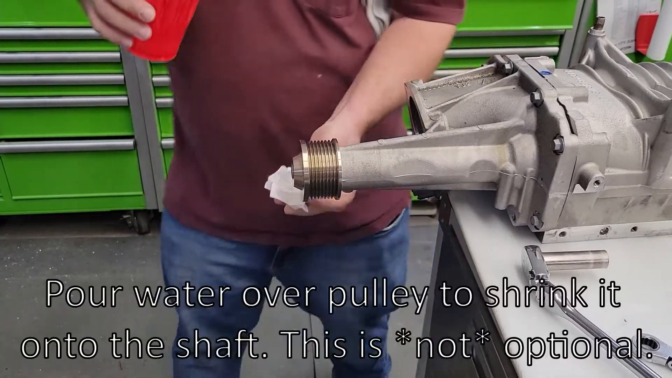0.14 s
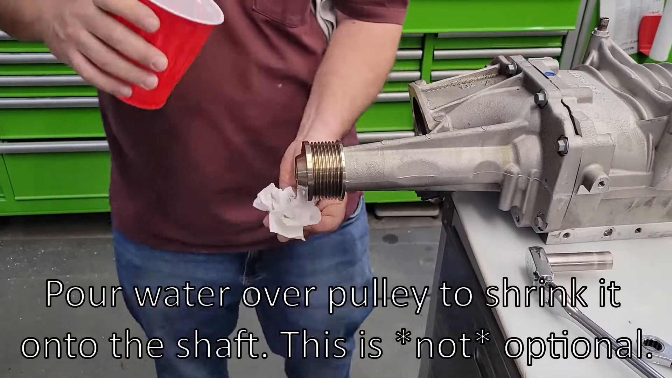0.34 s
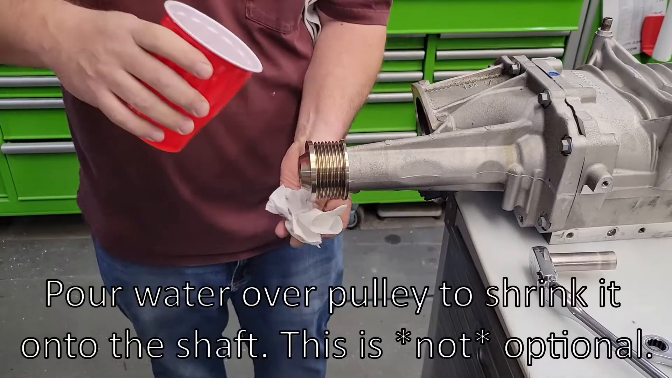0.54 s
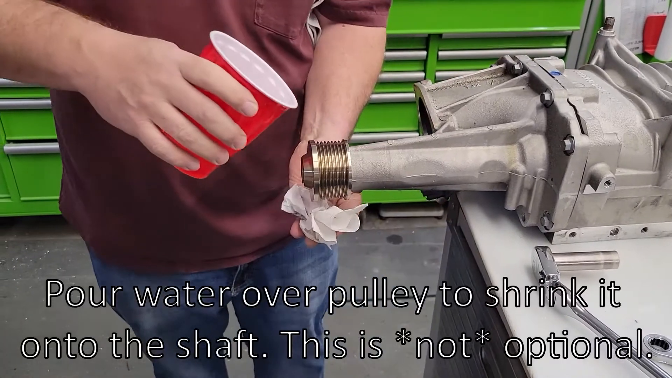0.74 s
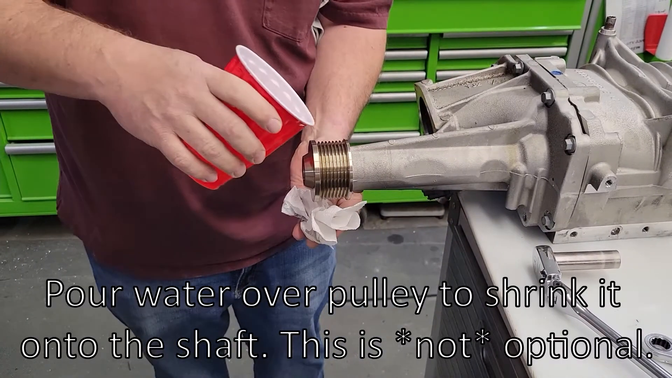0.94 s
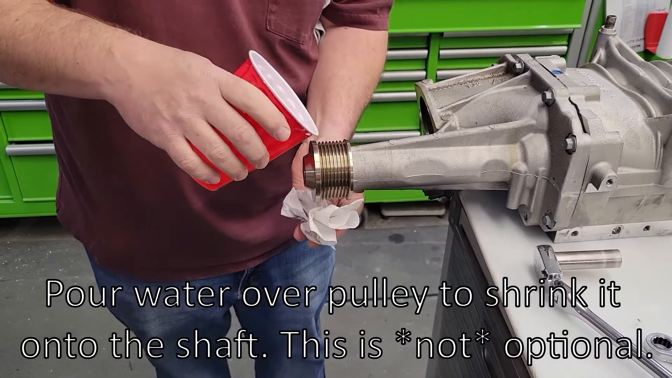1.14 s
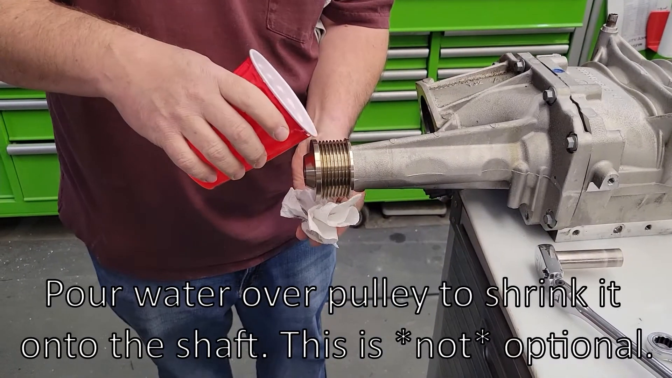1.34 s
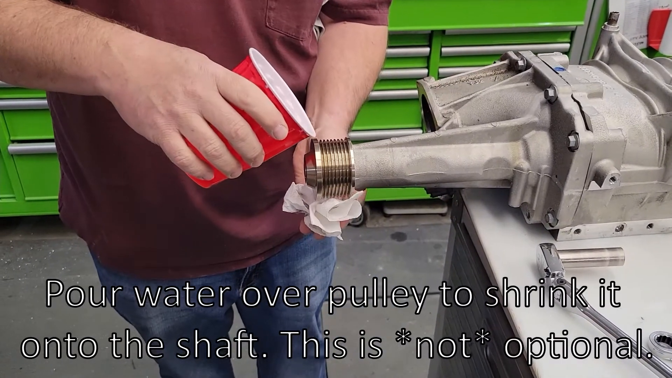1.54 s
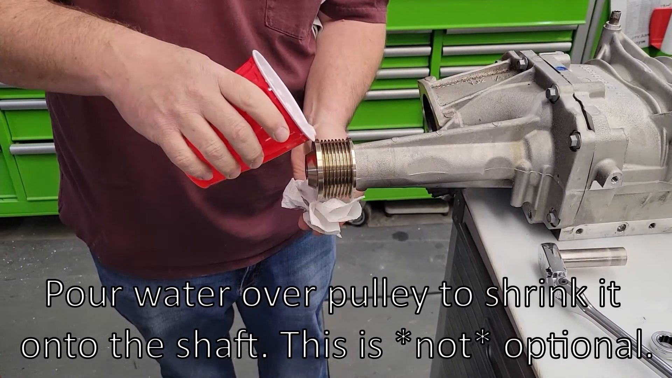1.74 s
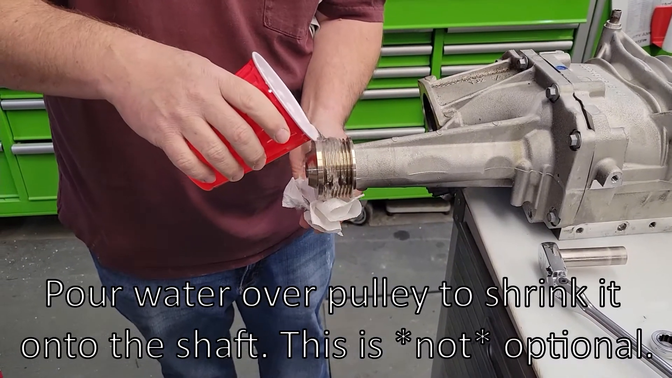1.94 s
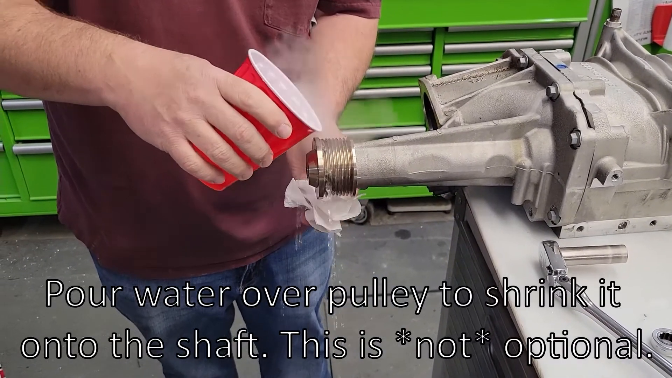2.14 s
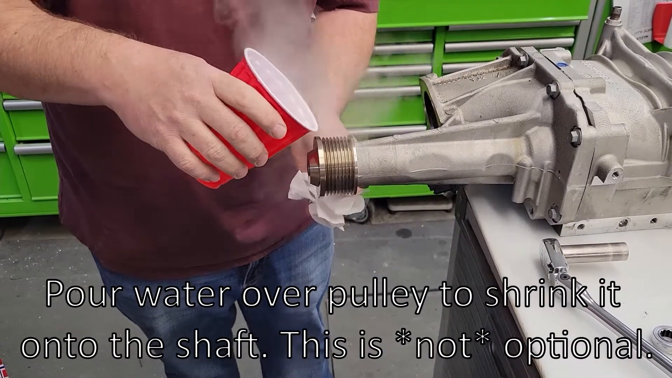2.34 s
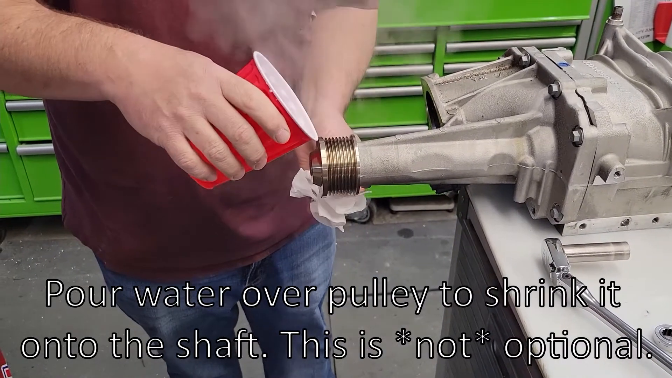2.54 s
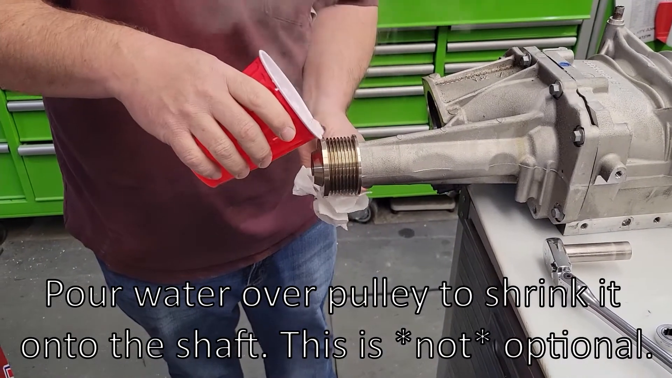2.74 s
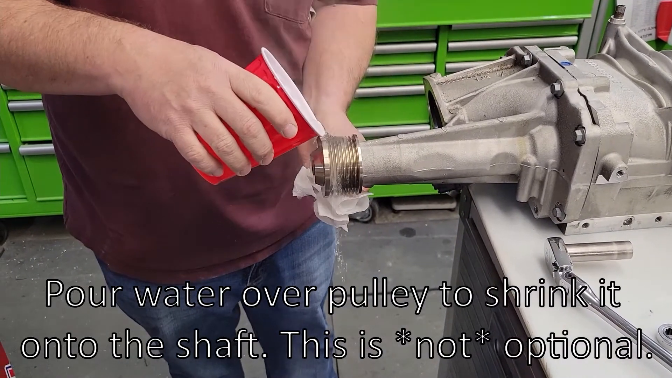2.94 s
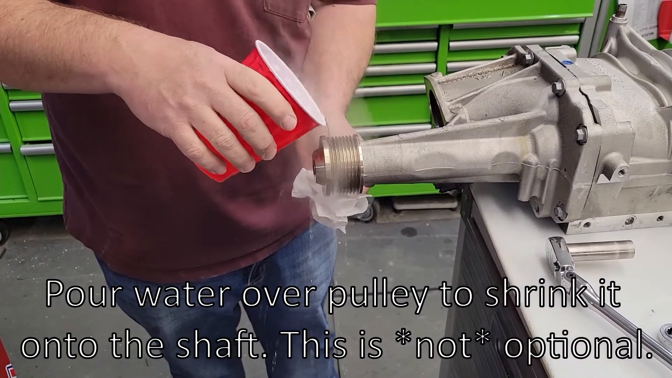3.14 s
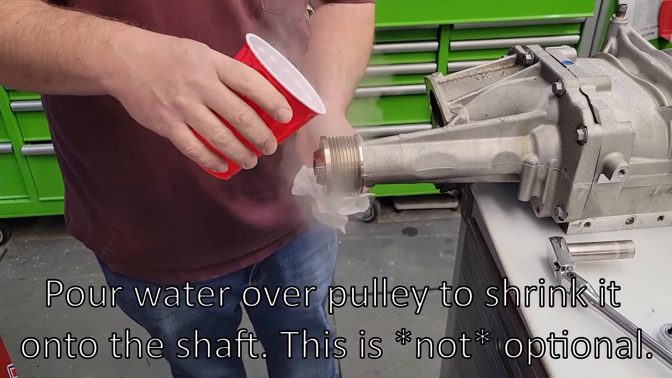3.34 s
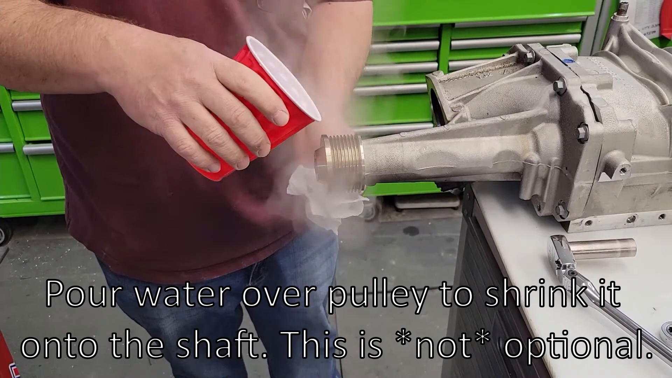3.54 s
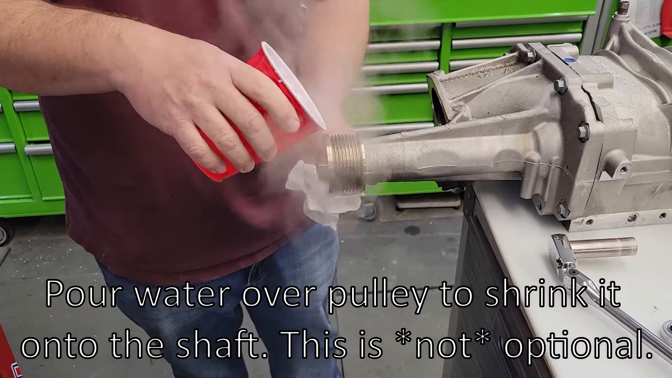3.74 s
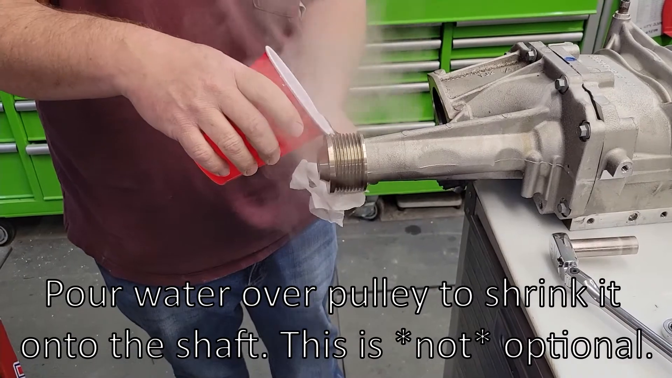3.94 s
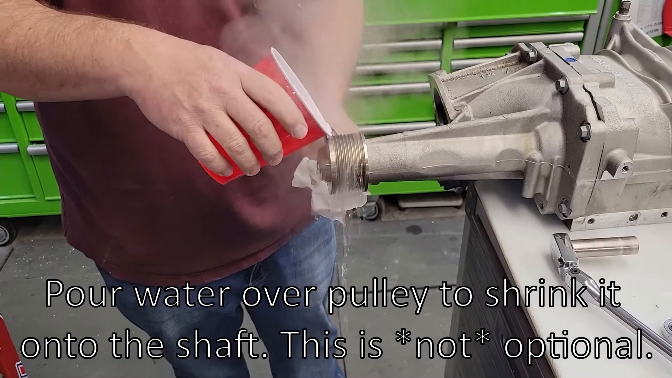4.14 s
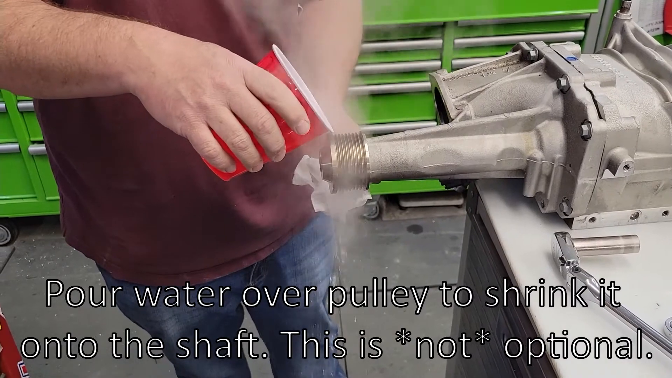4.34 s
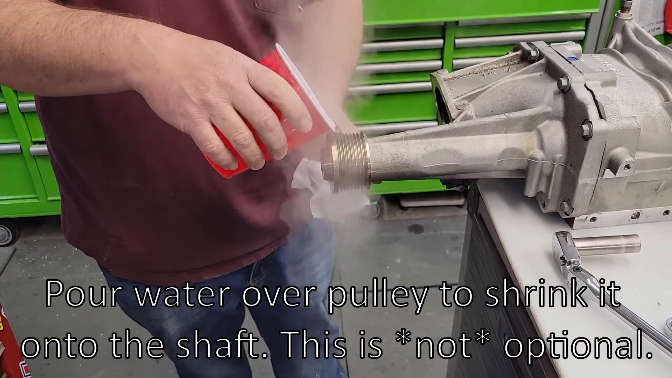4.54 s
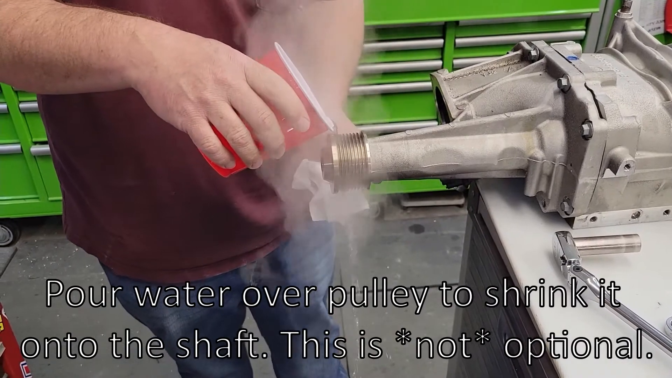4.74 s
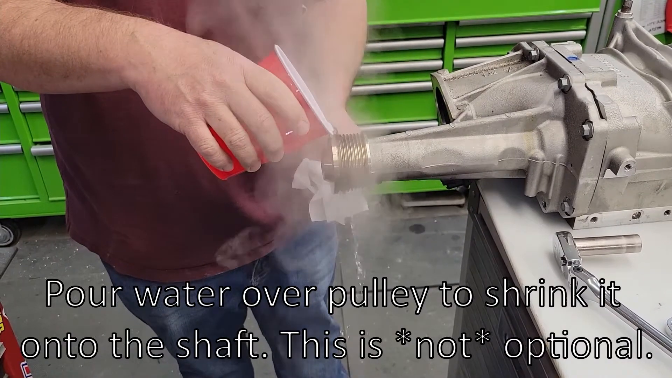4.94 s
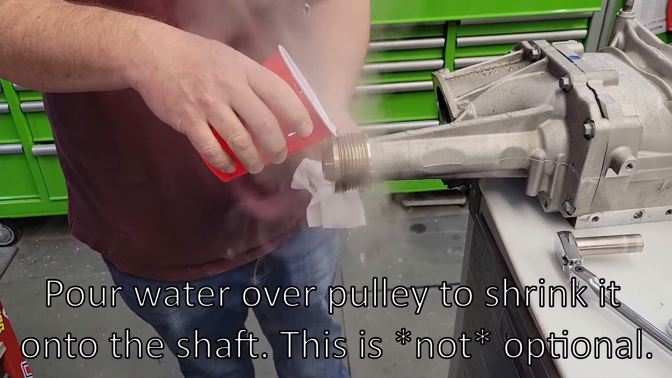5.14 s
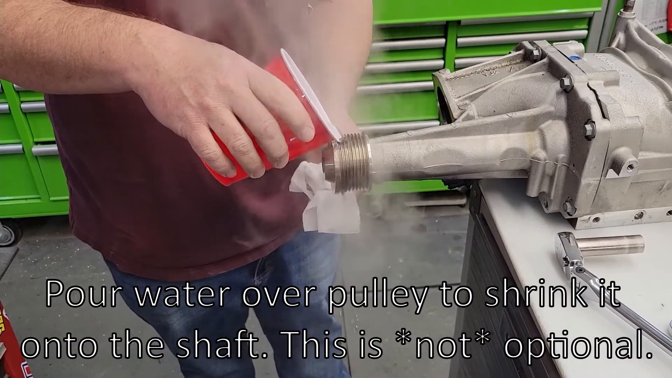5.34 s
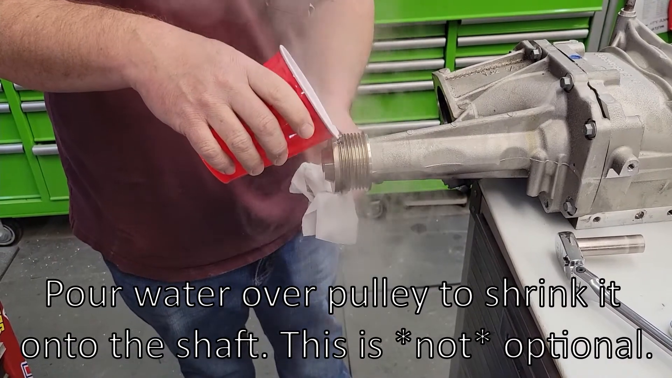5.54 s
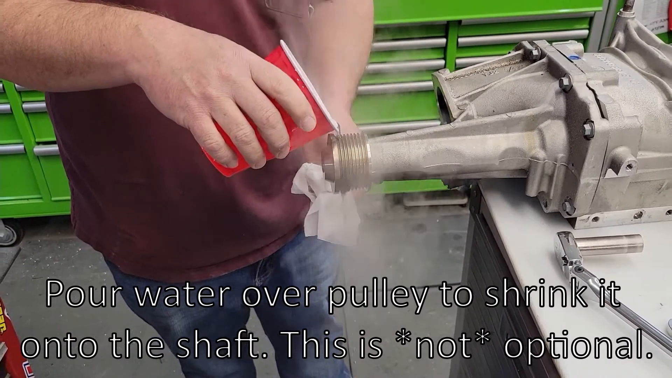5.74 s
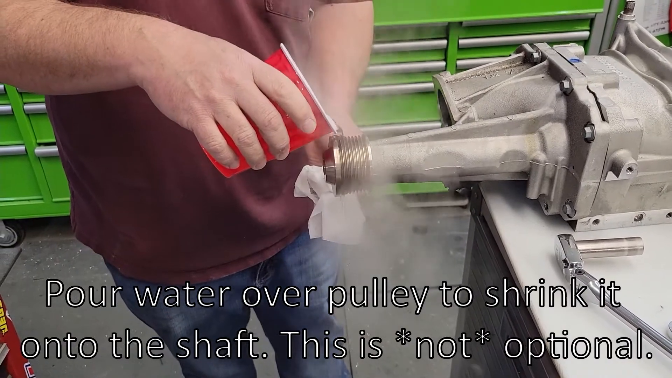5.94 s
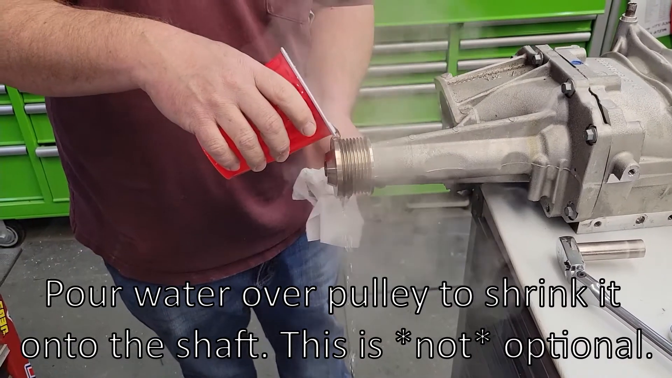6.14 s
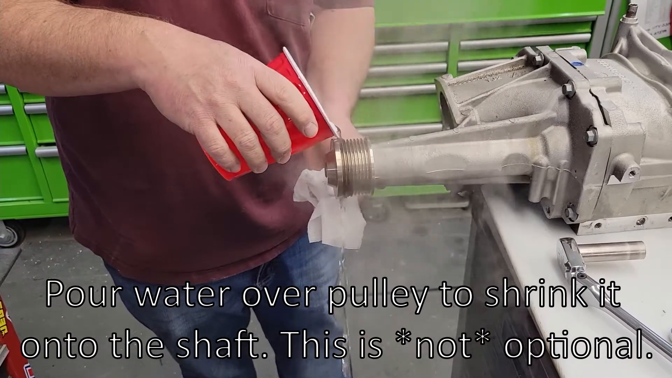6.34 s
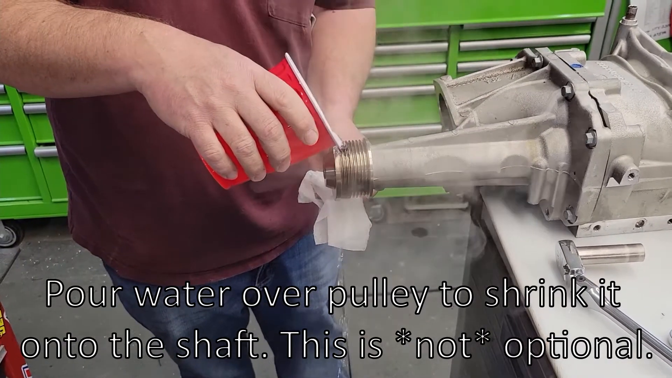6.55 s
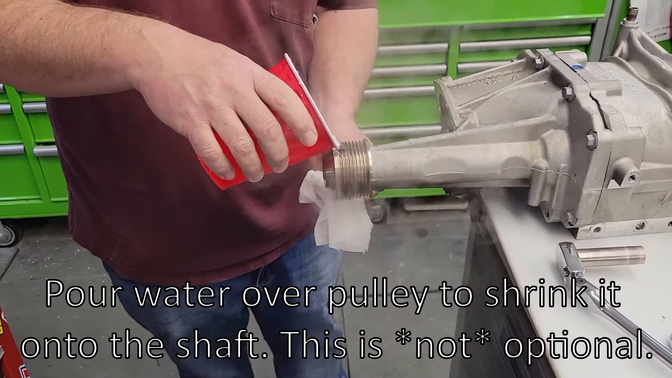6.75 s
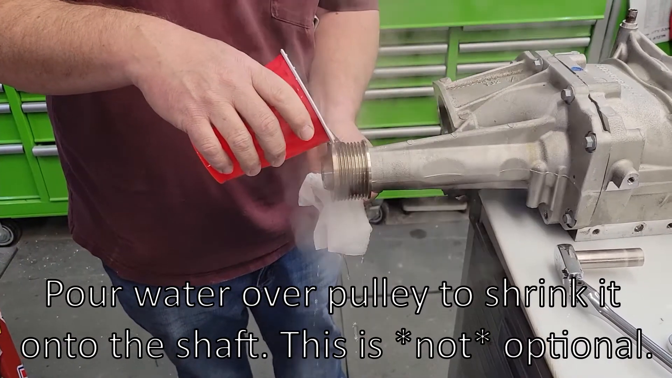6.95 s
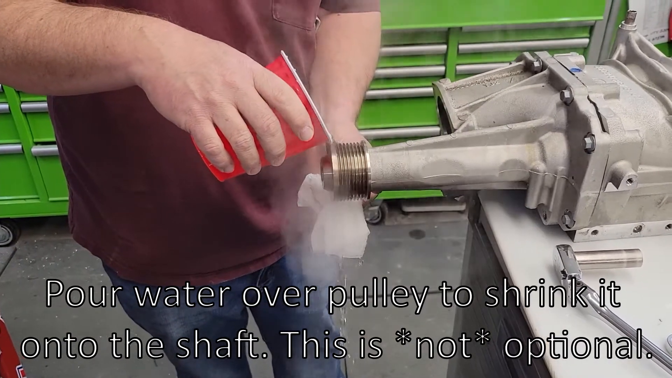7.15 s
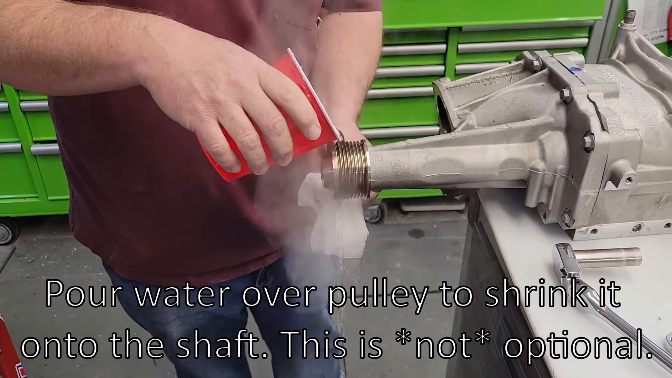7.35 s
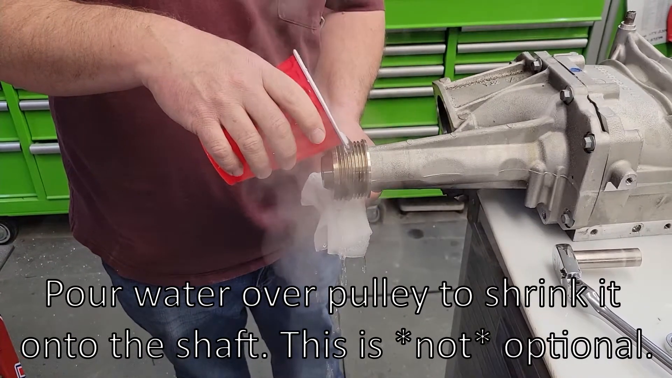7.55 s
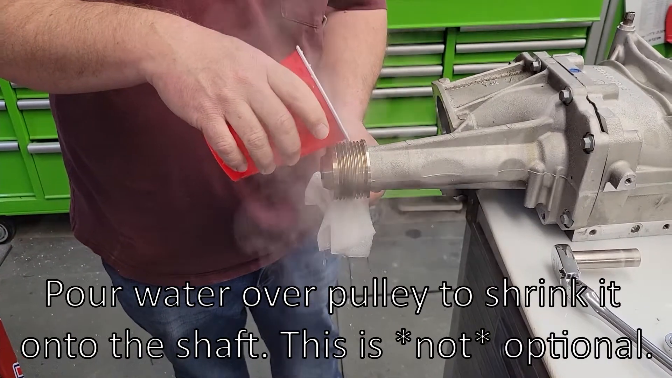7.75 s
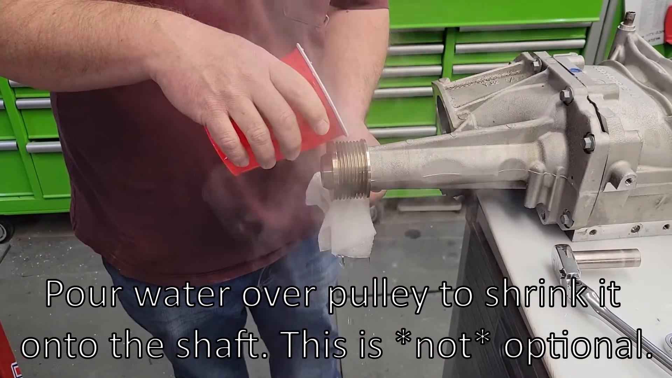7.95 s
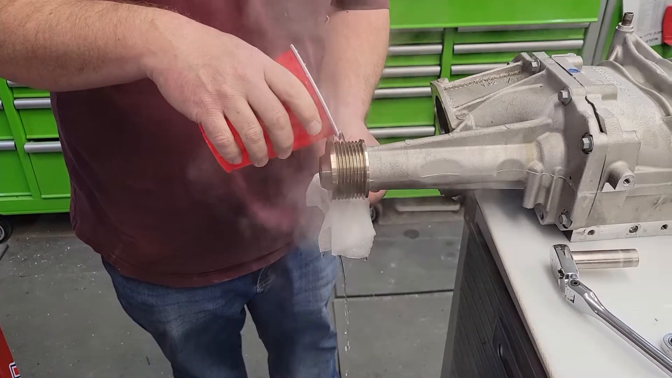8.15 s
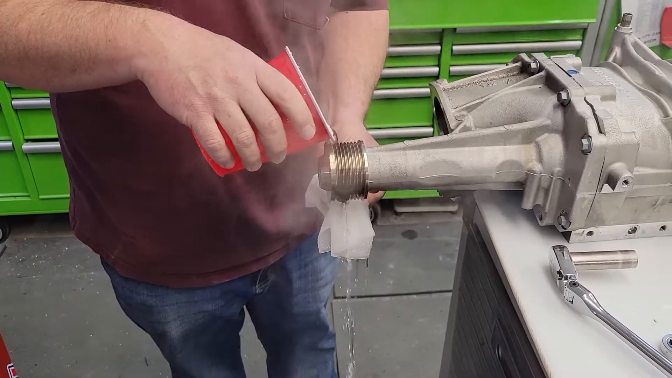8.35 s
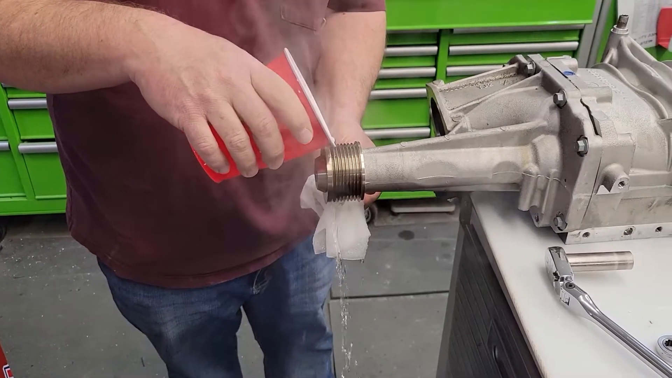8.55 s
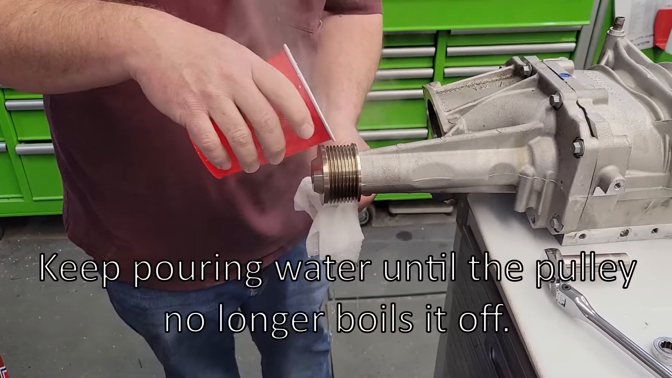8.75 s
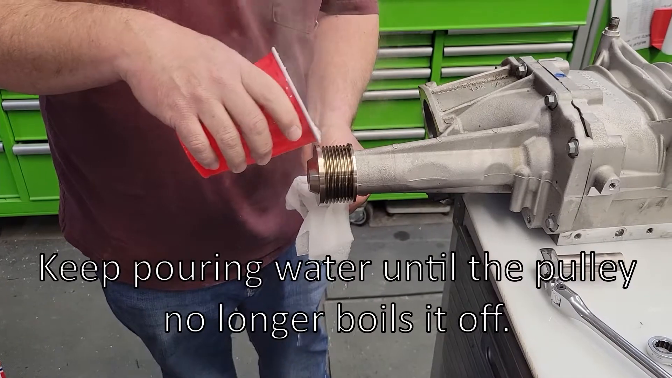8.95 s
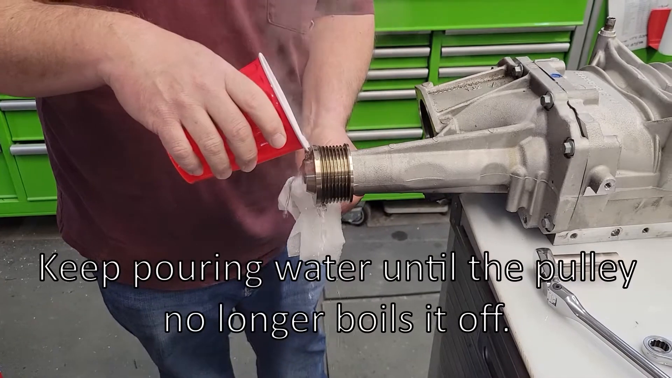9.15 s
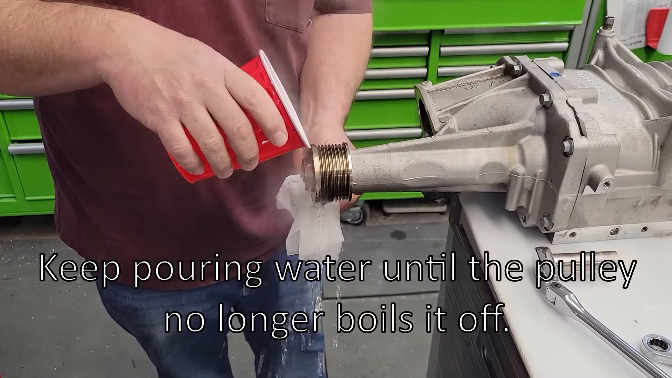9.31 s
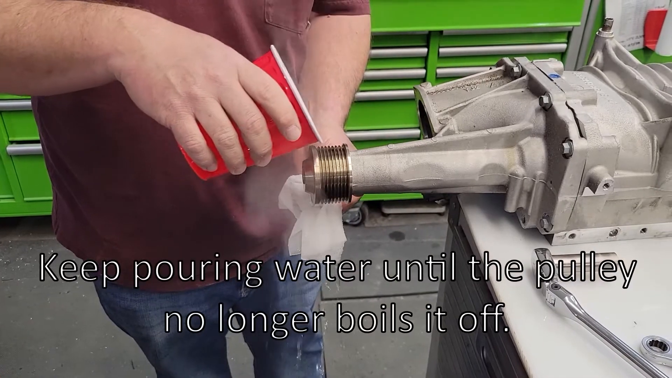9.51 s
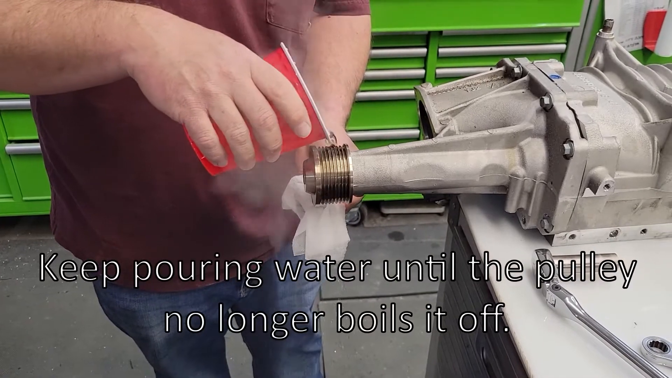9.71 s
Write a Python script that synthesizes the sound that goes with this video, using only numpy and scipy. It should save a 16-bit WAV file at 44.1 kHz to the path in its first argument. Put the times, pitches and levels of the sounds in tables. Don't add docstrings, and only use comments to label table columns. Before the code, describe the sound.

Cloth rustles and small knocks on a workshop bench, then water splashes onto hot metal, hissing, sizzling and spitting over a low fan rumble.

```python
import sys
import numpy as np
from scipy import signal
from scipy.fft import rfft, irfft, next_fast_len
from scipy.io import wavfile
from scipy.ndimage import uniform_filter1d

SR = 44100
rng = np.random.default_rng(int(sys.argv[2]) if len(sys.argv) > 2 else 0)


def to_wav(s):
    ch = np.atleast_2d(s).T
    pcm = np.round(np.clip(ch, -1, 1) * 32767)
    wavfile.write(sys.argv[1], SR, pcm.astype(np.int16))


def magnitude_from_level(level_db):
    exponent = np.asarray(level_db, float) / 20
    return 10 ** exponent


N = 431298
SIZE = 8192
STEP = 32
HZ = np.maximum(np.fft.rfftfreq(SIZE, 1 / SR), 1)
T = np.arange(N) / SR

# f/Hz, level/dB per Hz
SHOP_SPECTRUM = [(13, -23), (22, -15), (64, -7), (112, -12.5), (205, -17), (310, -23), (337, -17),
                 (444, -26), (750, -26.5), (1450, -40), (3920, -45.5), (6620, -45.5), (9740, -57),
                 (12100, -59), (16000, -59)]
# f/Hz, level/dB
FAN_LINES = [(37.7, -87), (58, -74), (80.7, -67), (107.7, -63), (269.2, -74.5), (748.3, -79)]
# loudest t/s, level/dB, swell/dB per s, fade/dB per s, body over it/dB
RUSTLES = [(.038, -58, 170, 152, -8), (.094, -54, 700, 700, 2), (.14, -73, 60, 60, -2),
           (.246, -56.5, 130, 130, -7.5), (.35, -66, 30, 34, -7), (.416, -54, 500, 170, 0),
           (.5, -61, 60, 40, 1.5), (.802, -71, 891, 400, 4), (1.0, -79.5, 24, 43, 14.5),
           (1.32, -71.5, 25, 700, -6), (1.72, -70, 900, 300, -8)]
# t/s, peak/dB, tick f/Hz, rattle/dB, thump/dB
KNOCKS = [
    (0.089, -41, 3550, -13, -19),
    (0.108, -45, 1080, -17, -15),
    (0.341, -46, 802, -16, -23),
    (0.412, -38, 4160, -13.5, -13.5),
    (0.432, -35.5, 1370, -24, -12),
    (0.442, -43, 1040, -24, -25),
    (0.449, -43, 990, -31, -8),
    (0.799, -33, 1670, -8, -34),
    (0.897, -50, 1080, -11, -16),
]
# f/Hz, width/Hz, level/dB
BENCH_MODES = [(1050, 61, 10), (1760, 120, -2), (2140, 150, 4)]
# f/Hz, level/dB per Hz
RATTLE_SPECTRUM = [(250, -24), (600, -8), (1200, 1.5), (2400, -2.5), (3500, -10.5), (6000, -23),
                   (9000, -46)]
# start t/s, fizz/dB, wet/s, drying/dB per s, jets over fizz/dB
GUSHES = [(1.788, -22, 0.41, 70, -7), (2.772, -23.5, .55, 48, -4), (3.58, -44, .31, 200, -8.5),
          (3.932, -22.5, 0.31, 35, -3.5), (4.24, -30.5, 0.29, 71, -11), (4.507, -29.5, 0.7, 1, -0.5),
          (4.818, -30.5, 0.52, 122, -1.1), (5.303, -29.5, 0.35, 18, -1.5), (5.854, -37.5, 0.35, 13, -6.5),
          (5.978, -31.8, 0.22, 97, 0), (6.193, -40, .6, 15, 1.3), (6.55, -30, .46, 60, -2.4),
          (6.851, -30.5, 0.43, 80, -4), (7.296, -39.5, 0.28, 146, -7), (7.492, -35.5, 0.33, 132, -2),
          (7.605, -32, 0.32, 51, -3.5), (7.815, -38, 0.097, 10, -8.5), (8.076, -37, 0.28, 150, -3.5),
          (8.348, -42.5, 0.35, 146, -3.5), (8.781, -43.5, .56, 26, -6), (8.875, -27, 0.047, 352, -15),
          (9.03, -27, 0.024, 24, -1), (9.136, -29.5, 0.29, 68, -8), (9.545, -45.5, 0.14, 41, -7.5)]
# f/Hz, level/dB per Hz
FIZZ = [(1100, -36), (1700, -11.5), (2300, -3), (3300, -0.5), (3900, 1), (5000, -2), (5600, -6),
        (6300, -35), (7500, -40)]
# f/Hz, level/dB per Hz
STEAM = [(6500, -68), (8000, -1.5), (9000, -4.5), (10000, -5), (11200, -5.5), (12200, 2), (14000, 1),
         (15600, 2.5), (17000, -3.5)]
# f/Hz, level/dB per Hz
BOIL = [(350, -42), (520, -4.5), (800, 4.5), (1100, 4.5), (1500, -2), (2000, 0), (2600, -66)]
# f/Hz, level/dB per Hz
SPRAY = [(4100, -27.5), (5100, -10), (5900, 3.5), (7500, 6), (8500, -4.5), (10000, -34)]
# f/Hz, level/dB per Hz
RUMBLE = [(90, -40.5), (160, -6), (220, -1.5), (400, -5), (520, -15.5), (800, -57)]
# f/Hz, width/Hz, level/dB
PULLEY_MODES = [(510, 23, 10.5), (887, 26, 5.5), (1216, 64, 5), (1381, 61, 8), (1895, 140, 4),
                (2450, 120, -0.5), (2700, 75, -4), (2870, 130, 5.5), (3225, 160, -5), (3690, 84, 2)]
# t/s, peak/dB, bubble f/Hz, spray/dB
POPS = [(1.801, -32, 3960, -26), (1.806, -24, 4000, -15), (2.5085, -36, 3890, -20),
        (2.5479, -34.5, 3790, -7), (2.5972, -42.5, 3880, -5), (2.6421, -43, 5060, -4),
        (2.78, -44, 4010, -14), (2.786, -36, 4050, -24), (3.8567, -38, 4200, -7), (6.541, -23.5, 4090, -12),
        (6.6008, -14.5, 3420, -10), (6.6968, -23, 3950, -14), (7.4651, -36, 3830, -8),
        (7.6733, -31, 3900, -18), (7.7011, -16, 4700, -14), (8.0513, -28, 4900, -14), (8.32, -32, 4000, -8),
        (8.5254, -37, 4100, -17), (8.638, -24, 3890, -9.5), (8.7272, -25.5, 4830, -10),
        (8.813, -32.5, 6080, -12), (8.844, -36, 1910, -18), (8.9073, -12.5, 4100, -25),
        (8.9208, -18.5, 5240, -10), (9.0025, -21.5, 4170, -18), (9.0401, -16.5, 5470, -18.5),
        (9.6377, -25, 5600, -20), (9.6988, -49, 4690, -21), (9.7148, -24, 5930, -39),
        (9.7538, -28.5, 5100, -14)]
# f/Hz, gain/dB
PORT_GAIN = [(2500, 0), (3300, 2.5), (3900, 8), (4900, 10.5), (5700, 3), (7000, -5), (9000, -2.5),
             (10500, -14), (11600, 1.5), (15600, 5)]
# f/Hz, phase/rad
PORT_PHASE = [(300, 0), (600, -1.2), (2600, -1.54), (3400, 1), (4000, -1.52), (5300, -2.5), (6200, -1.5)]
# f/Hz, likeness/0-1
TREBLE_LIKENESS = [(10800, 0.04), (11800, 0.72), (15600, 1)]
# f/Hz, chance/0-1
SIDE_LOST = [(6300, 0), (7200, .25), (8600, .35), (9200, .03), (10900, .05), (11600, .6), (12500, .1),
             (13500, .75), (14600, .75), (15300, .45)]
# f/Hz, chance/0-1
MID_LOST = [(6000, 0), (7200, .03), (8500, .08), (9500, .02), (10800, .02), (11500, .1), (12100, .01),
            (15500, .01)]

SHOP_DB = -55.5
ROOM_DB, ROOM_T60_S, ROOM_BASS_HZ = -5, 0.29, 350
SPREAD_S, SAG_DB_PER_S = 0.097, 6.5
FLASH_DB, FLASH_S, JETS_BUILD_S, JETS_LAG = 11.5, 0.37, 0.27, 0.51
FILM_DB, FILM_S, FILM_PER_JET = -13, 0.22, -0.42
BIG_DB, BIG_S, BIG_PER_JET, BIG_COOLING_DB_PER_S = -13, 0.37, -0.62, 1.09
SPRAY_DB, SPRAY_COOLING_DB_PER_S, SPRAY_PER_JET = -7, 0.3549, 0.46
RUNOFF_AFTER_S, RUNOFF_SPRAY_DB = 7.05, 3.5
BORE_DB, BORE_RISE_S, BORE_WET_S, BORE_DROWNS_DB_PER_S = -45.5, 0.085, .48, 120
CRACK_DB, MIST_DB = -47, -5.5


def unit(x):
    return x / np.sqrt(np.mean(x ** 2))


def at(table, hz):
    points = np.array(table)
    return np.interp(np.log(hz), np.log(points[:, 0]), points[:, 1])


def colour(x, table, bumps=()):
    db = at(table, HZ) + sum(d / (1 + (2 * (HZ - f) / w) ** 2) for f, w, d in bumps)
    cepstrum = irfft(np.log(magnitude_from_level(db)))
    cepstrum[1:SIZE // 2] *= 2
    cepstrum[SIZE // 2 + 1:] = 0
    response = irfft(np.exp(rfft(cepstrum)))
    return signal.oaconvolve(np.atleast_2d(x), response[None], axes=1)[:, :N]


def highpass(x, hz):
    return signal.sosfilt(signal.butter(2, hz, "high", fs=SR, output="sos"), x)


def walk(rate_hz):
    hold = int(SR / rate_hz)
    steps = np.repeat(rng.standard_normal(N // hold + 1), hold)
    return 1.135 * uniform_filter1d(uniform_filter1d(steps, hold), hold)[:N]


def bursts(per_s, spread_db, hiss):
    hit = rng.random(N) < per_s / SR
    size = np.minimum(rng.exponential(size=N), 6)
    sign = np.sign(rng.standard_normal(N))
    return unit(hit * sign * magnitude_from_level(spread_db * size)) + hiss * rng.standard_normal(N)


def ring(hz, t60_s, seconds=.3):
    t = np.arange(int(seconds * SR)) / SR
    return np.sin(2 * np.pi * hz * t) * magnitude_from_level(-60 * t / t60_s)


def add(out, x, s):
    i = int(s * SR)
    out[i:i + len(x)] += x[:N - i]


def mix(db_rows):
    return np.interp(T, T[::STEP], np.sqrt(np.sum(magnitude_from_level(db_rows) ** 2, axis=0)))


def rise_db(age_s, rise_s):
    return 20 * np.log10(1e-6 + np.tanh(age_s / rise_s))


def shop():
    whine_and_hump = [(12400, 120, 13), (3000, 400, 9.9)]
    mid, side = colour(rng.standard_normal((2, N)), SHOP_SPECTRUM, whine_and_hump)
    side = 0.269 * side + highpass(side, 320)
    air = magnitude_from_level(SHOP_DB - 3.5 + 1.4 * walk(2.87)) * np.array([mid + side, mid - side]) / np.std(mid)
    lines = np.zeros(N)
    for hz, db in FAN_LINES:
        level = magnitude_from_level(db + 1.0 + 2.2 * walk(4.4))
        turns = hz * np.cumsum(1 + 0.01134 * walk(4.4)) / SR
        lines += level * np.sin(2 * np.pi * turns)
    return air + lines


def rustling():
    peak_s, db, swell, fade, body_db = np.transpose(RUSTLES)[..., None]
    late_s = T[::STEP] - peak_s
    cloth_db = db - np.where(late_s < 0, -swell, fade) * late_s
    grains = bursts(per_s=1500, spread_db=3.5, hiss=1.0)
    cloth = magnitude_from_level(-0.5) * unit(colour(grains, FIZZ))
    cloth += magnitude_from_level(-8.5) * unit(colour(grains, SPRAY))
    cloth += magnitude_from_level(-12.5) * unit(colour(grains[::-1], STEAM))
    body = unit(colour(grains, BOIL))
    return (mix(cloth_db) * cloth + mix(cloth_db + body_db + 1.5) * body)[0]


def knocking():
    out = np.zeros(N)
    rattle = unit(colour(rng.standard_normal(N), RATTLE_SPECTRUM, BENCH_MODES))[0]
    t = T[:SR // 3]
    decay = magnitude_from_level(-60 * t / 0.16) + 1.6 * magnitude_from_level(-60 * t / 0.03)
    thump = ring(400, 0.024) + 0.42 * ring(187, 0.032)
    bench = ring(1010, 0.26) + 0.66 * ring(1130, .3) + 0.36 * ring(1410, 0.27) + .35 * ring(2137, .3)
    for s, db, hz, rattle_db, thump_db in KNOCKS:
        i = int(s * SR)
        add(out, magnitude_from_level(db - 1) * (ring(hz, 0.025) + magnitude_from_level(thump_db + 12) * thump), s)
        add(out, magnitude_from_level(db + rattle_db) * decay * rattle[i:i + len(t)], s)
        add(out, magnitude_from_level(db + rattle_db - 11.0) * bench, s + 0.00407)
    return out


def gushes():
    start_s, db, wet_s, drying, jets_db = np.transpose(GUSHES)[..., None]
    age = np.maximum(T[::STEP] - start_s, 0)
    cooled_s = start_s - start_s[0]

    fizz = db + rise_db(age, SPREAD_S) - SAG_DB_PER_S * age
    fizz = fizz - drying * np.maximum(age - wet_s, 0)

    steam = fizz + jets_db + FLASH_DB * np.exp(-age / FLASH_S)
    steam = steam + JETS_LAG * rise_db(age, JETS_BUILD_S)

    film = fizz + FILM_DB + FILM_PER_JET * jets_db + rise_db(age, FILM_S)

    big = film + BIG_DB + BIG_PER_JET * jets_db
    big = big + BIG_COOLING_DB_PER_S * cooled_s + 2 * rise_db(age, BIG_S)

    spray = fizz + SPRAY_DB + SPRAY_COOLING_DB_PER_S * cooled_s + SPRAY_PER_JET * jets_db
    spray = spray + RUNOFF_SPRAY_DB * (cooled_s > RUNOFF_AFTER_S)

    first = age[:1]
    bore = BORE_DB + rise_db(first, BORE_RISE_S)
    bore = bore - BORE_DROWNS_DB_PER_S * np.maximum(first - BORE_WET_S, 0)
    return [mix(layer) for layer in (fizz, steam, film, big, spray, bore)]


def boiling():
    wet, jets, film, big, drops, dry_bore = gushes()
    facing = bursts(per_s=2500, spread_db=3.5, hiss=2.0)
    rim = np.array([bursts(per_s=2500, spread_db=2.5, hiss=2.0) for _ in "lr"])
    crowd = facing + 0.96 * rim
    fine = crowd[:, ::-1] + 0.88 * rng.standard_normal((2, N))
    coarse = facing + 0.71 * rng.standard_normal((2, N))

    fizz = wet * magnitude_from_level(-1.5 + 0.47 * walk(30)) * unit(colour(crowd, FIZZ, PULLEY_MODES))
    spray = drops * magnitude_from_level(3.5 + 0.17 * walk(30)) * unit(colour(np.roll(crowd, 40, axis=1), SPRAY))
    boil = film * magnitude_from_level(1.0 + 0.95 * walk(23)) * unit(colour(crowd, BOIL, PULLEY_MODES))
    steam = jets * magnitude_from_level(2.5 + 0.62 * walk(40)) * unit(colour(fine, STEAM))
    rumble = big * magnitude_from_level(-1.5 + 0.68 * walk(6.5)) * unit(colour(coarse, RUMBLE))
    bore_spectrum = [(600, -36), (760, -10.0), (850, 11), (950, 1), (1200, -48)]
    bore = dry_bore * unit(colour(facing, bore_spectrum))
    beads = facing[::-1] * (np.abs(facing[::-1]) > 9.5)
    ticks = wet ** 0.61 * magnitude_from_level(-33.5) * (unit(colour(beads, STEAM)) + unit(colour(beads, FIZZ)))
    surge = magnitude_from_level(1.3 * walk(60))
    return surge * (fizz + spray + boil + steam) + ticks + bore + rumble


def spitting():
    out, noise = np.zeros(N), rng.standard_normal(N)
    fizz = unit(colour(noise, FIZZ) + 0.87 * colour(noise, SPRAY))[0]
    steam = unit(colour(noise[::-1], STEAM))[0]
    t = T[:SR // 5]
    for s, db, hz, spray_db in POPS:
        i = int(s * SR)
        cut = t[:N - i]
        fizz_here, steam_here = fizz[i:i + len(t)], steam[i:i + len(t)]
        onset = np.minimum(cut / 0.00077, 1.5) ** 0.88
        bubble = magnitude_from_level(13.5) * ring(hz, 0.0034)[:len(cut)] * onset
        crack = magnitude_from_level(CRACK_DB - db) * steam_here + magnitude_from_level(-18) * fizz_here
        crack = crack * magnitude_from_level(-60 * cut / 0.0076)
        decay = magnitude_from_level(spray_db - 60 * cut / 0.03) + magnitude_from_level(spray_db - 5 - 60 * cut / 0.1)
        spray = decay * (fizz_here + magnitude_from_level(MIST_DB) * steam_here)
        add(out, magnitude_from_level(db) * (bubble + crack + spray), s + .001)
    return out


def room(x):
    t = T[:SR // 2]
    mid, side = rng.standard_normal((2, len(t))) * magnitude_from_level(-60 * t / ROOM_T60_S) * (t > .003)
    side = highpass(side, ROOM_BASS_HZ)
    echoes = np.array([mid + side, mid - side]) / np.sqrt(2 * np.sum(mid ** 2))
    echoes = signal.sosfilt(signal.butter(1, 5000, fs=SR, output="sos"), echoes)
    return magnitude_from_level(ROOM_DB) * signal.fftconvolve(x[None], echoes, axes=1)[:, :N]


def scene():
    near = boiling() + spitting() + rustling() + knocking()
    return magnitude_from_level(-1.0) * (near + room(near[0])) + shop()


def treble_dropouts(pair):
    hz, _, (mid, side) = signal.stft([pair[0] + pair[1], pair[0] - pair[1]], SR, nperseg=512)
    hz = np.maximum(hz, 1)
    frames = mid.shape[1]
    band = (hz // 520).astype(int)
    luck = rng.random((3, 64, frames // 9 + 1))[:, band].repeat(9, axis=2)[..., :frames]
    jump = magnitude_from_level(6.3 * (luck[2] - .5) * (hz[:, None] > 5800))
    side = side * jump * (luck[0] > at(SIDE_LOST, hz)[:, None])
    mid = mid * jump * (luck[1] > at(MID_LOST, hz)[:, None])
    mid, side = signal.istft([mid, side], SR, nperseg=512)[1][:, :N] / 2
    return np.array([mid + side, mid - side])


def top_cut(x):
    return signal.sosfilt(signal.butter(12, 17020, fs=SR, output="sos"), x)


def record(dry):
    size = next_fast_len(N + SIZE)
    hz = np.maximum(np.fft.rfftfreq(size, 1 / SR), 1)
    left, right = rfft(dry, size)
    share = np.clip(at(TREBLE_LIKENESS, hz), 0, 1)
    turned = right * np.exp(1j * at(PORT_PHASE, hz))
    right = magnitude_from_level(at(PORT_GAIN, hz)) * (share * left + np.sqrt(1 - share ** 2) * turned)
    top = signal.ellip(12, .3, 55, 15740, fs=SR, output="sos")
    pair = signal.sosfilt(top, irfft([left, right], size)[:, :N])
    return top_cut(treble_dropouts(pair))


dry = scene()
out = record(dry)
to_wav(out)
```